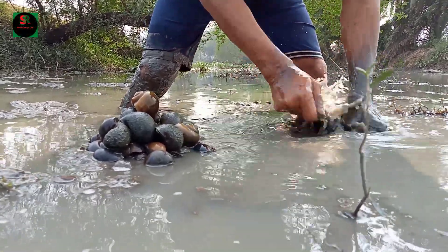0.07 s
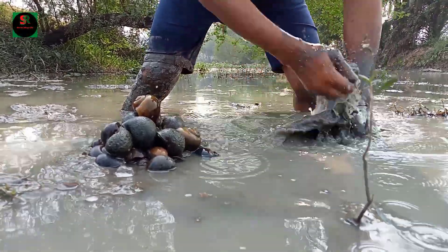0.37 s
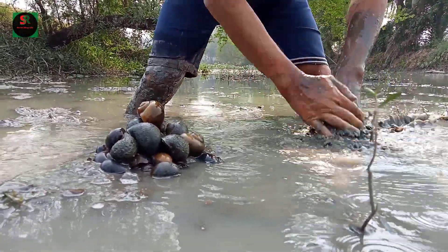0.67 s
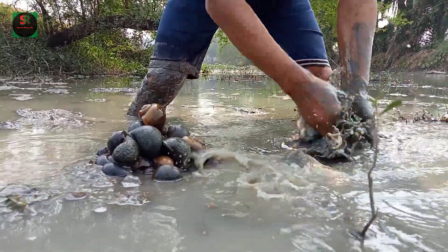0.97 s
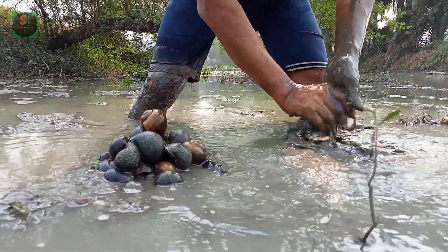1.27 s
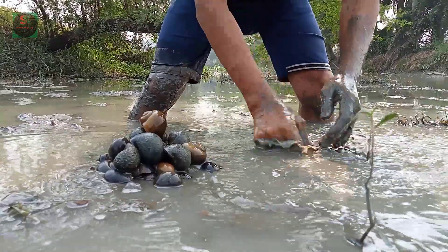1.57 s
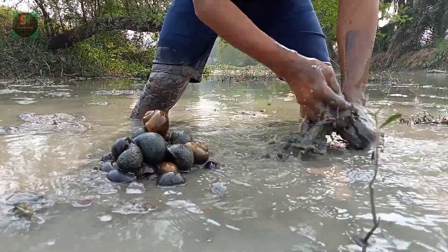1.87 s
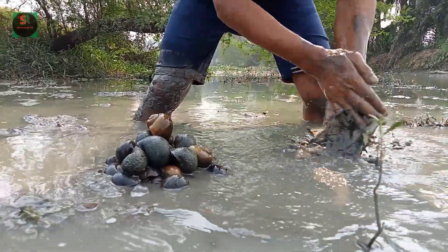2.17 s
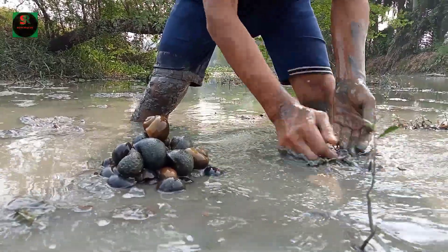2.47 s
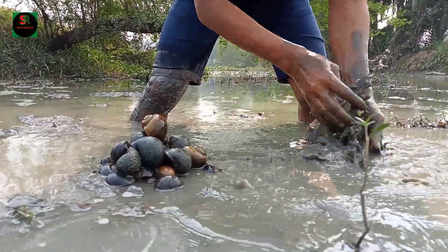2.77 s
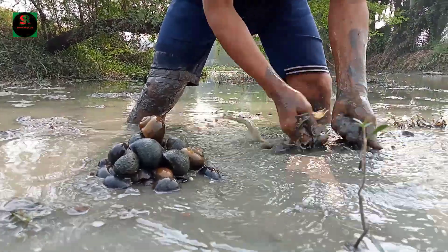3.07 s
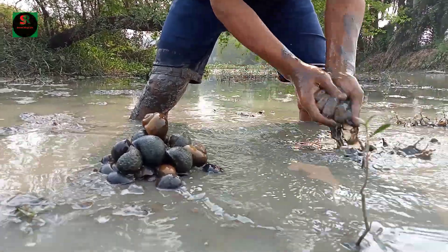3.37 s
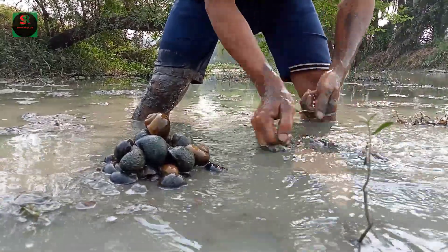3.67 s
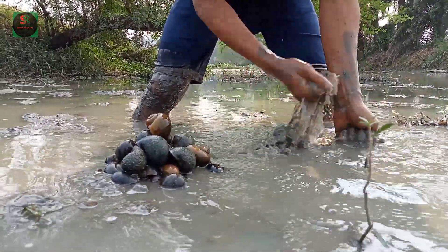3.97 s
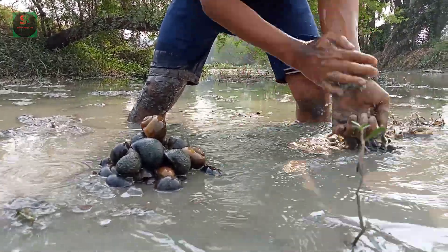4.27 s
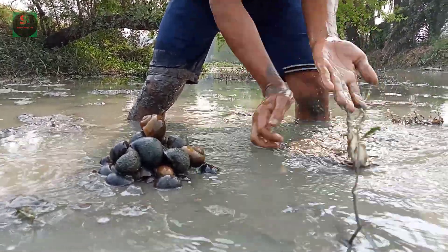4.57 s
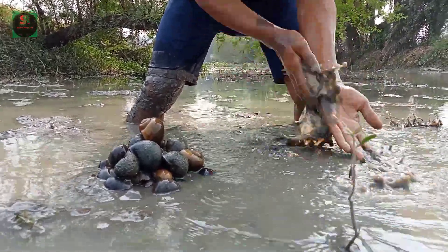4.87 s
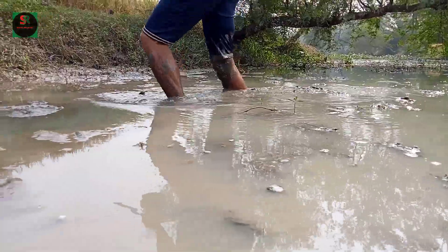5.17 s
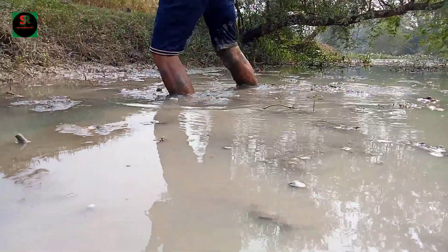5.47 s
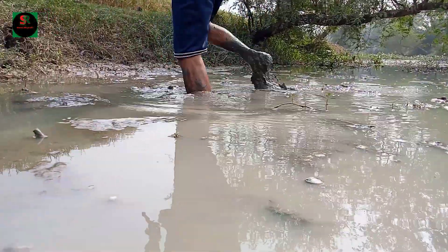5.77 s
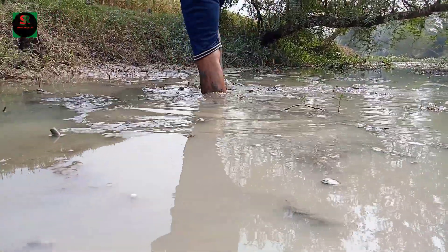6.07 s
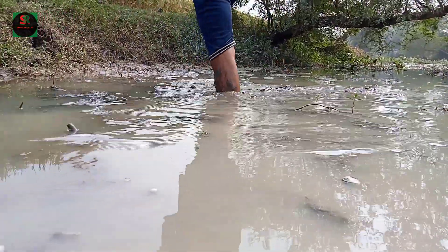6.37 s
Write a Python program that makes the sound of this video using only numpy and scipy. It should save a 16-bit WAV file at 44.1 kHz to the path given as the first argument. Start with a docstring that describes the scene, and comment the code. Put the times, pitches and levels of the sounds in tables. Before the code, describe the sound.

Close, wet sloshing and squelching of hands digging in muddy water outdoors, followed by soft wading steps and small plops.

```python
"""Hands in mud and shallow water

Hands scoop and squeeze mud close by; from 5 s someone wades further off, over quiet outdoor air.
Each stroke swells, holds and settles. It traps a swarm of air bubbles that ring briefly, big ones
low and small ones high, with snapping wet mud and spray on top. Mostly during the wading,
ripples plop nearby and small bubbles chirp upward as they reach the surface."""
import sys
import numpy as np
from scipy import signal
from scipy.io import wavfile

SR = 44100
rng = np.random.default_rng(int(sys.argv[2]) if len(sys.argv) > 2 else 0)


def wav_out(sig):
    """Save sig, one row per channel (or a flat mono array), as 16-bit PCM at SR to the path in sys.argv[1]."""
    wavfile.write(sys.argv[1], SR, np.round(np.clip(np.atleast_2d(sig).T, -1, 1) * 32767).astype(np.int16))


N = 283122

# How strong each sound is from low to high, all as (frequency [Hz], level [dB])
AIR_COLOUR = [(15, -50), (30, -24), (45, -9), (70, 2), (100, 1), (160, -5), (300, -10), (800, -15),
              (2000, -20), (3400, -19), (5000, -31), (7500, -29), (10000, -35), (16000, -38)]  # outdoor background
FAR_GULP_COLOUR = [(400, -4.5), (650, -5.5), (1100, -4.5)]  # big bubbles around the legs
FAR_SPRAY_COLOUR = [(4000, -4), (5200, -5.5), (6400, 0.5), (8000, -8), (10000, -8), (15000, -12)]  # drops from the legs
GULP_COLOUR = [(250, -13.5), (400, -20), (540, -11.5), (800, -2.5), (1050, 2), (1350, -29.5)]  # big bubbles around the hands
GURGLE_COLOUR = [(800, 1), (1100, -3), (1800, 1.5), (2400, 0.5), (2900, -1.5)]  # middling bubbles
TRICKLE_COLOUR = [(2100, -38), (2600, -4.5), (3100, -0.5), (3450, -1), (3950, -3.5), (4450, -15.5),
                  (5200, -29)]  # small bubbles in water
OOZE_COLOUR = [(2300, -21), (2900, 1), (3450, 11.5), (3950, 3.5), (4450, -24.5), (5200, -33.5)]  # small bubbles in mud
SPRAY_COLOUR = [(3300, -18), (4400, -9), (5300, -10.5), (6400, -3), (7600, 0), (8700, -.5), (10000, -7.5),
                (15500, -8.5)]  # water thrown by the hands
CRACK_COLOUR = [(4400, -10.5), (6400, -4), (8500, 2.5), (10000, -7.5), (15500, -9)]  # wet mud tearing

# Ripples plopping close by: (time [s], level [dB], starting pitch [Hz])
PLOPS = [(0.051, -46, 330), (1.947, -45.5, 330), (2.241, -42, 280), (3.301, -47.5, 667), (3.46, -47.5, 565),
         (5.0687, -29, 595), (5.087, -39.5, 450), (5.135, -48, 444), (5.253, -46.5, 400),
         (5.303, -31.5, 537), (5.3131, -25.5, 524), (5.5203, -32.5, 556), (5.5525, -30, 505),
         (5.827, -33.5, 630), (5.9543, -35.5, 624), (6.003, -45, 377), (6.2623, -32.5, 550)]
# Bubbles reaching the surface: (time [s], level [dB], starting pitch [Hz], length [s])
CHIRPS = [(3.48, -52.5, 1380, 0.027), (5.014, -59.5, 854, 0.044), (5.261, -51, 1130, 0.019),
          (5.335, -59, 1260, 0.036), (5.509, -51.5, 955, 0.028), (5.557, -48.5, 1240, 0.032),
          (5.616, -44.5, 2120, 0.0086), (5.888, -48, 780, 0.015), (5.981, -42, 2425, 0.027),
          (6.252, -50, 990, 0.034)]
# Wet mud snapping: (time [s], level [dB], pitch of the tiny air pocket [Hz])
SNAPS = [(0.8784, -18.5, 8150), (1.0904, -22.5, 8270), (1.3684, -18.5, 8100), (1.8852, -17, 6800),
         (2.4089, -15, 7570), (2.765, -21.5, 7240), (3.027, -18.5, 6840), (3.236, -21.5, 7630),
         (3.2944, -42, 7260), (3.3767, -22.5, 6640), (3.8864, -21, 7970), (4.0514, -26.5, 7400),
         (4.2443, -26.5, 7600), (4.3126, -19, 7060), (4.4002, -25.5, 7000), (4.7013, -23.5, 7240)]
# The loudest single bubbles: (time [s], level [dB], pitch [Hz], ring time [cycles])
LOUD_BUBBLES = [(0.0877, -25.5, 1475, 8.7), (0.098, -17, 3050, 2.4), (0.251, -20, 548, 2.8),
                (0.259, -25.5, 820, 1.8), (0.2699, -8, 3400, 1.4), (0.286, -30, 398, 1.04),
                (0.3727, -8.5, 2500, 0.42), (0.3908, -12.5, 1150, 1.5), (0.7954, -31.5, 463, 3.4),
                (1.0737, -19, 909, 9.9), (1.075, -18, 1153, 5.4), (1.0834, -15.5, 1800, 1.9),
                (1.135, -14, 2580, 1.1), (1.1505, -11, 1735, 5.5), (1.1669, -19.5, 720, 5.8),
                (1.198, -34.5, 450, 7.7), (1.2421, -22.5, 2650, 1.8), (1.669, -37, 3980, 5.7),
                (1.7979, -25, 3730, 7.6), (1.8202, -12.5, 3420, 6.2), (1.8456, -25.5, 1735, 10.5),
                (1.8919, -14.5, 893, 6), (1.9808, -27, 2080, 10), (2.0684, -13.5, 2830, 0.95),
                (2.1815, -13, 2980, 2.3), (2.364, -34, 620, 1.4), (2.6697, -20, 1540, 1.33),
                (2.755, -19.5, 895, 1.24), (2.7653, -25, 821, 5.5), (2.8456, -21, 3390, 18),
                (2.874, -28, 1900, 6.9), (2.9023, -18.5, 1840, 3.3), (3.028, -10.5, 3400, 2.9),
                (3.1217, -22.5, 1640, 1.9), (3.337, -35.5, 940, 3.3), (3.3862, -30, 1830, 6.7),
                (3.515, -35.5, 2930, 7.5), (3.612, -41, 1143, 4.1), (3.9218, -29, 1027, 5.3),
                (3.9276, -16, 3124, 7.6), (3.993, -28.5, 920, 5.5), (4.0321, -26, 714, 6.8),
                (4.278, -25, 1540, 1.6), (4.311, -20.5, 1310, 3.3), (4.3126, -7, 3160, 1.9),
                (4.322, -17, 2980, 4.4), (4.367, -45, 573, 7.1), (4.458, -32.5, 1890, 13.4),
                (4.69, -25.5, 3430, 15), (4.722, -16.5, 3340, 3.8), (4.79, -22.5, 1690, 5.1),
                (4.8147, -32, 1064, 4.6), (4.9468, -28.5, 2460, 7.5), (6.3067, -21, 3710, 5.8),
                (6.351, -26, 3390, 4.1)]
# Hands pushing through water and mud. Depth and spray add to the level, for gulps and thrown water:
# (time [s], swell [s], hold [s], level [dB], depth [dB], spray [dB])
HAND_STROKES = [(0.0, 0.02, 0.19, -41.5, -2, -11), (0.245, 0.0029, .23, -38.5, -2.5, -7.5),
                (0.522, 0.042, 0.045, -43, -1, -3.5), (0.643, 0.078, .2, -39, -17.5, -6),
                (0.985, 0.016, 0.0089, -38.5, 3, -7.5), (1.07, 0.0048, 0.12, -36.5, -1, -7),
                (1.21, 0.021, 0.13, -43.5, -2, -14.5), (1.321, 0.012, 0.08, -44.5, -17, -7.5),
                (1.431, 0.036, 0.024, -42, -43, -14.5), (1.668, 0.0015, .006, -68, -28, 10.5),
                (1.772, 0.089, 0.034, -38, -13, -9), (1.926, 0.012, 0.19, -47, -15.5, -10.5),
                (2.033, 0.015, 0.078, -40.5, -16, -14.5), (2.161, 0.015, .065, -34.5, -24.5, -9.5),
                (2.348, 0.015, 0.058, -38.5, -40.5, -9), (2.572, 0.046, 0.01, -42, -60, -4.5),
                (2.664, 0.002, 0.047, -37, -20, -12), (2.739, 0.0063, 0.029, -36.5, -5, -8),
                (2.79, 0.054, 0.13, -37.5, -18, -9), (2.953, 0.01, 0.21, -41, -32, -10.5),
                (3.18, 0.017, 0.065, -50, -69, -14), (3.282, .01, 0.026, -59, 4.5, 2),
                (3.329, 0.032, 0.01, -39.5, -31, -5.5), (3.443, 0.0106, 0.088, -68, -38, 0),
                (3.608, 0.0032, 0.013, -60, -24, -2.5), (3.797, 0.0026, 0.19, -50, -50, -8.5),
                (3.919, 0.0044, .14, -39.5, -10.5, -11), (4.112, 0.026, 0.13, -46.5, -20.5, -9.5),
                (4.267, 0.053, 0.012, -37.5, -26, -4.5), (4.386, .03, 0.015, -39, -48, -6.5),
                (4.465, 0.0041, 0.054, -49, -16.5, -2.5), (4.571, 0.015, 0.0084, -45.5, -44, -12),
                (4.681, 0.0031, 0.074, -52.5, -30, -3), (4.782, 0.016, 0.027, -35, -31, -14.5),
                (4.856, 0.012, 0.023, -45, -31.5, -17), (4.96, 0.011, .004, -75, -26.5, 9.5)]
# Legs pushing through the water further off; same columns as the hand strokes
LEG_STROKES = [(5.012, 0.033, 0.31, -62.5, -7.5, -16.5), (5.267, 0.036, .16, -57.5, -26, -11.5),
               (5.47, 0.035, 0.18, -59.5, -6, -11.5), (5.7, .04, 0.081, -65.5, -6, -15),
               (5.79, 0.031, 0.15, -58.5, -8, -13), (5.885, 0.041, 0.098, -49.5, -12, -24),
               (6.046, 0.023, 0.048, -53, -10, -6), (6.153, 0.019, 0.016, -42, -17, -7.5),
               (6.236, 0.022, 0.11, -52, -11.5, -9.5)]
# How much the hands squeeze mud rather than throw water: (time [s], share of mud [0-1])
MUD_SHARE = [(0, .1), (1.3, .1), (1.9, .3), (2.4, .5), (3.0, .8), (3.5, .9), (3.95, .6), (4.3, .8),
             (4.9, .6)]
# How fast a stroke dies away: (gulps [dB/s], gurgle [dB/s], trickle [dB/s], spray [dB/s])
SETTLE_RATES = [404, 295, 260, 232]
# Water draining between hand strokes: (gulps [dB], gurgle [dB], trickle [dB], spray [dB])
REST_LEVELS = [-92.5, -86, -79, -79.5]


def gain_of(db):
    """Turns decibels into a number to multiply a sound by."""
    return 10 ** (np.asarray(db) / 20)


def evened(x):
    """Scales a sound to an average power of one."""
    return x / np.sqrt(np.mean(x ** 2) + 1e-20)


def add(mix, start_s, sound):
    """Mixes a sound in at the given time."""
    part = mix[max(round(start_s * SR), 0):][:len(sound)]
    part += sound[:len(part)]


def blend(watery, muddy, share):
    """Fades between two sounds, keeping the power steady."""
    return np.sqrt(1 - share) * watery + np.sqrt(share) * muddy


def coloured(x, colour):
    """Filters a sound to follow a colour table, falling 24 dB per octave beyond its ends."""
    table_hz, db = np.transpose(colour)
    hz = abs(np.fft.fftfreq(4096, 1 / SR)) + 1
    octaves_outside = abs(np.log2(hz / np.clip(hz, table_hz[0], table_hz[-1])))
    shape_db = np.maximum(np.interp(np.log(hz), np.log(table_hz), db) - 24 * octaves_outside, -100)
    response = np.exp(signal.hilbert(np.log(gain_of(shape_db))).conj())  # rings only after a click
    taps = np.fft.ifft(response).real[:len(hz) // 2]
    return signal.oaconvolve(x, taps)[:len(x)]


def clumps(span_s):
    """A smooth random wobble: drops come in bunches."""
    window = signal.windows.hann(int(span_s * SR) + 3)
    return evened(signal.oaconvolve(rng.standard_normal(N), window, "same"))


def impacts(per_s, spread_db):
    """Random clicks, mostly small and a few large."""
    size = gain_of(spread_db * np.minimum(rng.exponential(1, N), 4))
    return size * rng.choice([-1, 1], N) * (rng.random(N) < per_s / SR)


def bubble(hz, cycles, onset_cycles=0.96):
    """Trapped air rings and dies away; the bigger the bubble, the more its pitch climbs."""
    ring_s = cycles / hz
    rise = 0.077 * (1000 / hz) ** .7
    t = np.arange(int(6 * ring_s * SR) + 2) / SR
    shape = (1 - np.exp(-t * hz / onset_cycles)) ** 2 * np.exp(-t / ring_s)
    return shape / shape.max() * np.sin(2 * np.pi * hz * t * (1 + rise * t / ring_s / 2))


def swarm(low_hz, high_hz, per_s, cycles, spread_db, sizes=48):
    """Bubbles of many sizes and ring times, each born at random moments."""
    out = np.zeros(N)
    for hz in np.geomspace(low_hz, high_hz, sizes):
        ring_cycles = cycles * np.exp(rng.uniform(-.8, .8))
        births = impacts(per_s / sizes, spread_db)
        out += signal.oaconvolve(births, bubble(hz, ring_cycles) * hz / np.sqrt(ring_cycles))[:N]
    return evened(out)


def stirred(grains, colour, level_db, wash_db, span_s):
    """Bubbles or clicks over a wash of countless tiny ones, as strong as the water is stirred."""
    x = coloured(grains + gain_of(wash_db) * rng.standard_normal(N), colour)
    window = signal.windows.hann(int(span_s * SR) + 3)
    local_power = abs(signal.oaconvolve(x ** 2, window / window.sum(), "same"))
    return x / np.sqrt(local_power + 1e-12) * gain_of(level_db)


def stroke_level(strokes, settle_db_per_s, rest_db, swell_db=18):
    """Level in dB over time: each stroke swells and holds, then the water settles."""
    t = np.arange(0, N, 32) / SR
    power = np.full(len(t), gain_of(rest_db) ** 2)
    for start_s, swell_s, hold_s, db in strokes:
        rising_db = swell_db * np.minimum((t - start_s) / max(swell_s, .002) - 1, 0)
        settled_db = settle_db_per_s * np.maximum(t - start_s - swell_s - hold_s, 0)
        power += gain_of(db + rising_db - settled_db) ** 2
    return np.interp(np.arange(N) / SR, t, 10 * np.log10(power))


def stirring(strokes, rest_levels):
    """Levels of gulps, gurgle, trickle and spray: deeper strokes trap bigger bubbles."""
    start_s, swell_s, hold_s, db, depth_db, spray_db = np.transpose(strokes)
    layers = [db + depth_db, db + 4 + 0.29 * depth_db, db, db + spray_db]
    return np.array([stroke_level(zip(start_s, swell_s, hold_s, level), settle, rest)
                     for level, settle, rest in zip(layers, SETTLE_RATES, rest_levels)])


def outdoor_air(level_db=-71.5):
    """A quiet, steady rumble with a little hiss."""
    return gain_of(level_db) * evened(coloured(rng.standard_normal(N), AIR_COLOUR))


def surroundings(x, near_db=-13, near_fade_s=0.069, far_db=-28, far_fade_s=0.067, body_db=-17):
    """The stooping body gives one echo, legs and mud scatter more, the wooded bank adds a faint tail."""
    t = np.arange(SR // 2) / SR
    near, far = rng.standard_normal((2, len(t))) * (rng.random((2, len(t))) < .1)
    near = near * (t > .002) * gain_of(-60 * t / near_fade_s)
    far = far * (t > .02) * gain_of(-60 * t / far_fade_s)
    echoes = gain_of(near_db) * near / np.linalg.norm(near) + gain_of(far_db) * far / np.linalg.norm(far)
    samples = np.arange(N)
    delay_s = 0.0095 + .001 * np.sin(2 * np.pi * samples / SR)  # the body sways
    body_echo = np.interp(samples - delay_s * SR, samples, x, left=0)
    return x + gain_of(body_db) * body_echo + signal.oaconvolve(x, echoes)[:N]


def lapping(level_db=-70):
    """Small waves from the wading legs lap softly nearby."""
    fade_in = np.clip((np.arange(N) / SR - LEG_STROKES[0][0]) * 100, 0, 1)
    return fade_in * gain_of(level_db) * swarm(89, 455, per_s=40, cycles=1.0, spread_db=1.6)


def drips(level_db=-70):
    """Single drops fall from the wet hands until the wading begins."""
    fade_out = np.clip((LEG_STROKES[0][0] - np.arange(N) / SR) * 100, 0, 1)
    low = swarm(1800, 4000, per_s=22, cycles=7, spread_db=4, sizes=16)
    high = swarm(6500, 9000, per_s=30, cycles=12, spread_db=4, sizes=16)
    return fade_out * gain_of(level_db) * evened(low + high)


def chirps(pitch_ratio=1.7):
    """A bubble's pitch sweeps up as the water above it thins."""
    out = np.zeros(N)
    for start_s, db, start_hz, length_s in CHIRPS:
        hz = np.geomspace(start_hz, pitch_ratio * start_hz, int(length_s * SR))
        tone = np.sin(2 * np.pi * np.cumsum(hz) / SR)
        add(out, start_s, gain_of(db) * signal.windows.tukey(len(hz), .8) * tone)
    return out


def plops(swell_s=0.0014, decay_s=0.0034, sag_s=0.002, final_share=0.18, slap_db=-11, slap_s=0.0019):
    """A hollow opens in a ripple with a soft slap and a short low tone that sags in pitch."""
    out, t = np.zeros(N), np.arange(SR // 20) / SR
    shape = (1 - np.exp(-t / swell_s)) * np.exp(-t / decay_s)
    soften = signal.butter(1, 2600, fs=SR)
    for start_s, db, start_hz in PLOPS:
        hz = start_hz * (final_share + (1 - final_share) * np.exp(-t / sag_s))
        tone = shape / shape.max() * np.sin(2 * np.pi * np.cumsum(hz) / SR)
        slap = signal.lfilter(*soften, np.exp(-t / slap_s) * rng.standard_normal(len(t)))
        add(out, start_s, gain_of(db) * (gain_of(slap_db) * slap - tone))
    return out


def wading():
    """Further off, legs stir up bubbles and their drops merge into a thin patter."""
    gulp_db, gurgle_db, trickle_db, spray_db = stirring(LEG_STROKES, rest_levels=[-120] * 4)
    gulps = stirred(swarm(450, 1100, 200, 3.5, 3), FAR_GULP_COLOUR, gulp_db - 6.5, -12.5, .1)
    gurgle = stirred(swarm(800, 2700, 360, 5, 6.1), GURGLE_COLOUR, gurgle_db - 5, -2.5, .07)
    trickle = stirred(swarm(2500, 3950, 950, 4.2, 4.9), TRICKLE_COLOUR, trickle_db, -1.5, 0.12)
    drops = evened(evened(impacts(600, 4.2)) + swarm(5500, 8500, 500, 8, 4.5))
    patter = stirred(drops, FAR_SPRAY_COLOUR, spray_db, wash_db=-2, span_s=0.07)
    return gulps + gurgle + trickle + patter


def mud_snaps(crack_s=0.0029, crack_db=-14, pocket_db=-2):
    """A film of wet mud tears with a short, bright crack, and a tiny air pocket rings."""
    out, t = np.zeros(N), np.arange(SR // 100) / SR
    for start_s, db, hz in SNAPS:
        crack = coloured(np.exp(-2 * t / crack_s) * rng.standard_normal(len(t)), CRACK_COLOUR)
        crack *= np.sqrt(crack_s * SR) / np.linalg.norm(crack)
        add(out, start_s, gain_of(db + crack_db) * crack)
        add(out, start_s, gain_of(db + pocket_db) * bubble(hz, cycles=6.4, onset_cycles=2.5))
    return out


def loud_bubbles():
    """Single air pockets shut in by the hands and feet ring out above the rest."""
    out = np.zeros(N)
    for start_s, db, hz, cycles in LOUD_BUBBLES:
        add(out, start_s, gain_of(db) * bubble(hz, max(cycles, .5)))
    return out


def scooping_hands(clump_db=3.0, clump_s=0.024, surge_db=3.5, surge_s=0.0087):
    """Big bubbles gulp, middling ones gurgle, small ones trickle, and thrown water sprays."""
    levels = stirring(HAND_STROKES, REST_LEVELS) + surge_db * clumps(surge_s)
    gulp_db, gurgle_db, trickle_db, spray_db = levels
    gulps = stirred(swarm(380, 1200, 360, 4.37, 4.5), GULP_COLOUR, gulp_db - 1.5, -3.5, 0.13)
    gurgle = stirred(swarm(1000, 2692, 600, 4.2, 5.2), GURGLE_COLOUR, gurgle_db, -5.5, 0.096)
    squelch = stirred(swarm(950, 2200, 110, 7, 5.5), GURGLE_COLOUR, gurgle_db, -11, 0.07)
    trickle = stirred(swarm(2300, 4500, 900, 6, 4.2), TRICKLE_COLOUR, trickle_db, 0.63, 0.03)
    ooze = stirred(swarm(2900, 4100, 760, 6.1, 5.5), OOZE_COLOUR, trickle_db - .5, 1.5, 0.081)
    droplets = stirred(swarm(5800, 9500, 900, 7, 5.3), SPRAY_COLOUR, spray_db, -11, .06)
    crackle = stirred(evened(impacts(1800, 4.8)), SPRAY_COLOUR, spray_db, -9, .06)
    # Thick mud squelches, oozes and crackles in place of the watery sounds.
    mud = np.interp(np.arange(N) / SR, *np.transpose(MUD_SHARE))
    spray = blend(droplets, crackle, share=0.6 * mud) * gain_of(clump_db * clumps(clump_s) + 0.94)
    return gulps + blend(gurgle, squelch, mud) + blend(trickle, ooze, mud) + spray


def scene():
    """Water and mud sounds over quiet outdoor air, in one channel."""
    air = outdoor_air()
    water = scooping_hands() + wading() + loud_bubbles() + mud_snaps() + drips() + chirps()
    return (surroundings(water) + plops() + lapping() + air)[None]


def record(dry):
    """The recorder loses the deep bass below 55 Hz and the treble above 15900 Hz."""
    thinned = signal.sosfilt(signal.butter(2, 55, "high", fs=SR, output="sos"), dry)
    treble_cut = signal.firwin(511, 15900, window=("kaiser", 9), fs=SR)
    return signal.oaconvolve(thinned, treble_cut[None], "same")


dry = scene()
out = record(dry)
wav_out(out)
```